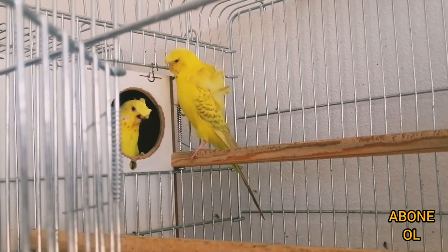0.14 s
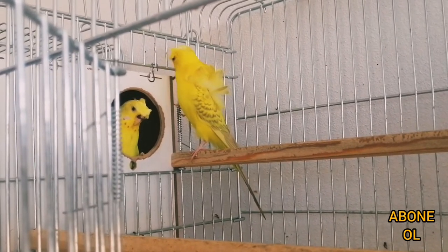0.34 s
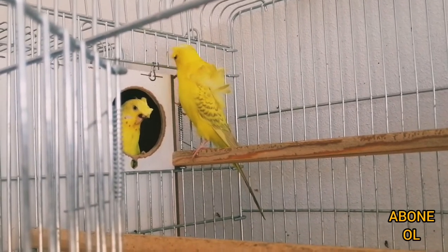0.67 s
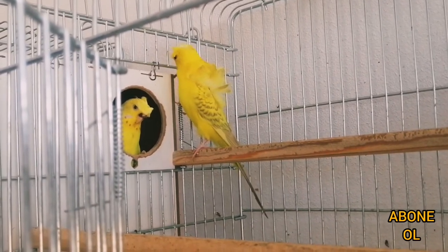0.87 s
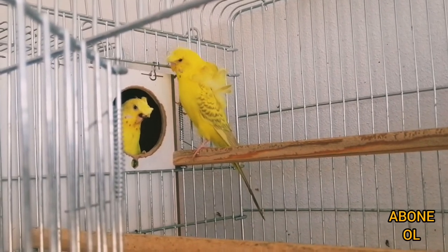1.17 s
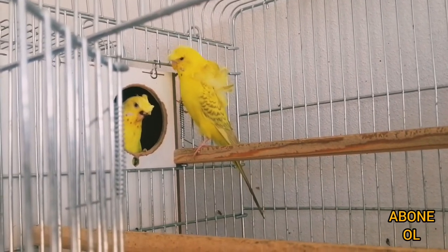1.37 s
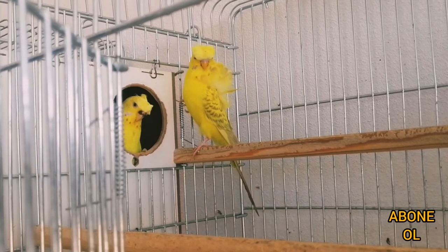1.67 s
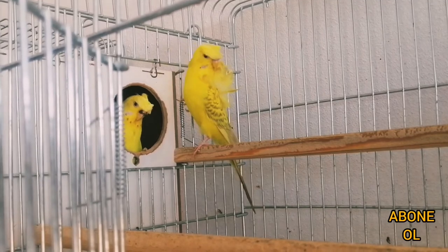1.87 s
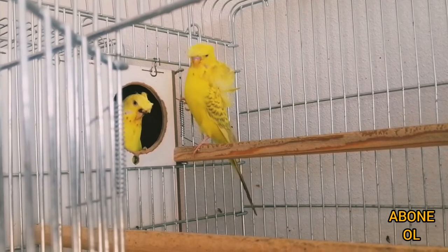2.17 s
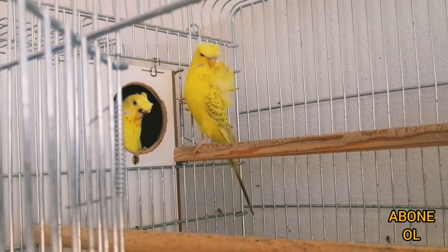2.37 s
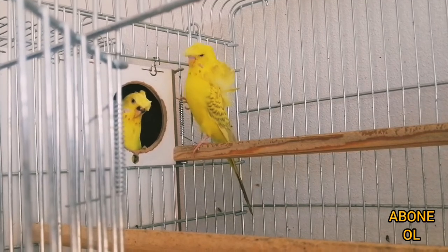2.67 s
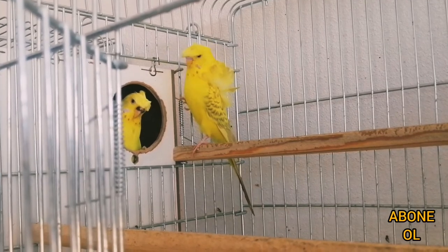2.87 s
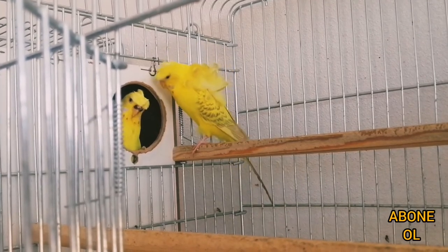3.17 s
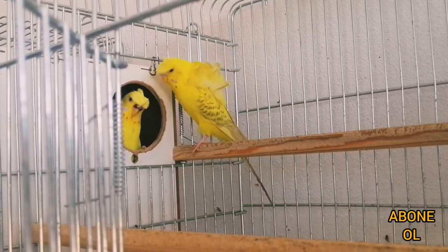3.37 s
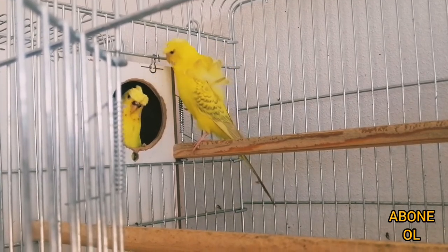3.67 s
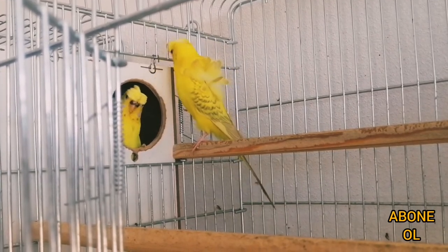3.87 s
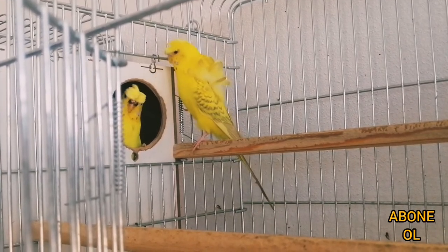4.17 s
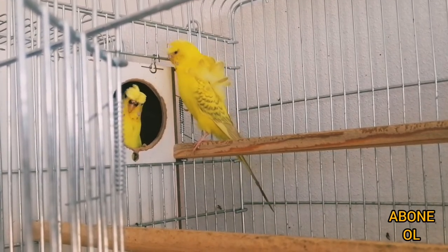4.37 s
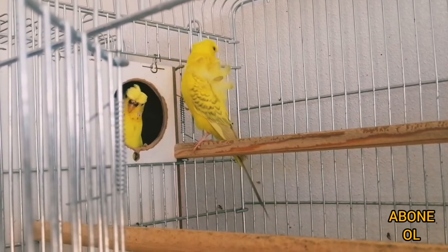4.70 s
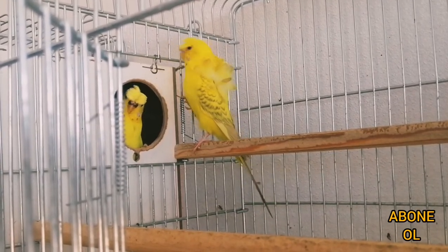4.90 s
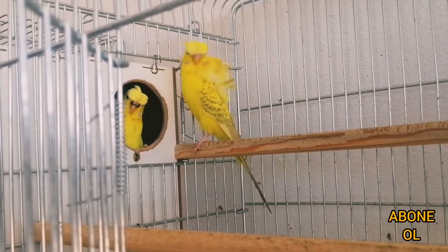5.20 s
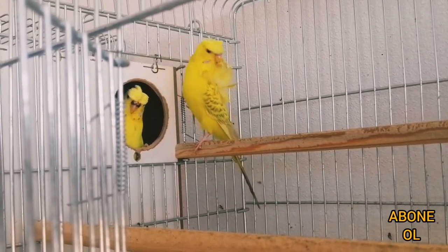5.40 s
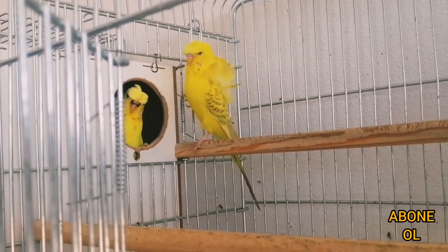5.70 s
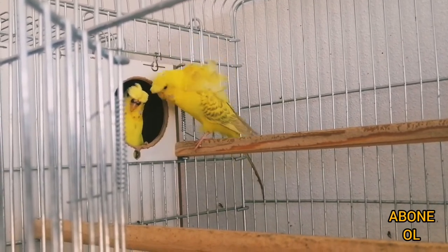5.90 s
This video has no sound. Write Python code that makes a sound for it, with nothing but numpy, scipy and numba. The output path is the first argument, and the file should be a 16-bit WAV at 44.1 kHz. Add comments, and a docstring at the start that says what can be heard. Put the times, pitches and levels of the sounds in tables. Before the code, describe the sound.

Small parakeets chatter with raspy bursts and warbling chirps indoors, while a dove coos softly beyond a low drone and hiss.

```python
"""Budgerigars call and scold in a bare, ringing room, a few metres from a phone with two microphones.
From the start a motor drones through the walls and the building hisses. Warbling whistles join in,
then a dove coos further off, three times in all. The loud opening call returns at 2.3 s. A bird beside
the phone chirps once early on and in a quick run from 4.3 s; from 5.2 s something rustles.
Throughout, the phone's gain control turns everything down under loud calls."""
import sys
import numpy as np
from scipy import signal
from scipy.fft import rfft, irfft
from scipy.io import wavfile
from scipy.ndimage import uniform_filter1d
from numba import njit

SR = 44100
rng = np.random.default_rng(int(sys.argv[2]) if len(sys.argv) > 2 else 0)


def pcm_store(signal):
    """Save signal as 16-bit PCM."""
    levels = np.round(np.clip(np.atleast_2d(signal), -1, 1) * 32767)
    wavfile.write(sys.argv[1], SR, levels.astype(np.int16).T)


N = 266805


def undb(db):
    """Turns decibels into a number to multiply by."""
    return 10 ** (np.asarray(db) / 20)


def set_level(x, db):
    """Scales a sound to an average (RMS) level."""
    return x * undb(db) / np.sqrt(np.mean(x ** 2))


def look_up(table, hz):
    """Reads between the rows of a (frequency, value) table, with octaves evenly spaced."""
    row_hz, values = np.transpose(table)
    return np.interp(np.log(hz + 1), np.log(row_hz + 1), values)


def colour(x, gain_at):
    """Makes each frequency louder or softer by gain_at(hz)."""
    return irfft(rfft(x) * gain_at(np.fft.rfftfreq(x.shape[-1], 1 / SR)), x.shape[-1])


def shape(x, spectrum, db):
    """Colours a sound by a (frequency_hz, gain_db) table, then sets its level."""
    return set_level(colour(x, lambda hz: undb(look_up(spectrum, hz))), db)


def resonance(hz, centre_hz, width_hz):
    """A hump that is 1 at its centre and falls away on both sides."""
    return 1 / (1 + (2 * (hz - centre_hz) / width_hz) ** 2)


def wander(rate_hz):
    """A smooth random wobble of typical size 1; a higher rate makes it quicker."""
    return set_level(colour(rng.standard_normal(N), lambda hz: np.exp(-(hz / rate_hz) ** 2)), 0)


def span(start_s, length_s, fade_s):
    """A note's samples, its progress from 0 to 1, and a swell that fades in and out."""
    at = slice(int(start_s * SR), min(int((start_s + length_s) * SR), N))
    progress = np.linspace(0, 1, at.stop - at.start)
    rise = progress if start_s else 1  # a note at time zero is already sounding
    ramp = np.clip(np.minimum(rise, 1 - progress) * length_s / fade_s, 0, 1)
    return at, progress, np.sin(np.pi / 2 * ramp) ** 2


def stereo_noise(size):
    """Noise that reaches the two microphones from all around; they hear the bass most alike."""
    # how alike the two sides are: frequency_hz, likeness (-1 to 1)
    likeness = [(60, 0.77), (290, 0.95), (630, 0.46), (1380, -0.075), (3000, 0.038)]
    common, opposite = rng.standard_normal((2, size))
    common = colour(common, lambda hz: np.sqrt((1 + look_up(likeness, hz)) / 2))
    opposite = colour(opposite, lambda hz: np.sqrt((1 - look_up(likeness, hz)) / 2))
    return np.array([common + opposite, common - opposite])


def phrase(notes, warble_hz, start_s=0, db=0):
    """Gives a pattern of notes a warble depth, a start time and a level."""
    return [(start_s + after_s, length_s, first_hz, last_hz, warble_hz, db + note_db)
            for after_s, length_s, first_hz, last_hz, note_db in notes if start_s + after_s < N / SR]


def sing(notes, warble_rate_hz, flutter_rate_hz, flutter, octave_db, breath_db, fade_s):
    """A bird's voice box (syrinx) makes a gliding, warbling tone, rough with flutter and breath."""
    # air rushing past the voice box: frequency_hz, gain_db
    breath_spectrum = [(1000, -42), (1900, -3), (3200, 1.5), (5500, -19), (9000, -24), (15000, -60.5)]
    warble = wander(warble_rate_hz)
    tremble = 1 + flutter * wander(flutter_rate_hz)
    breath = shape(rng.standard_normal(N), breath_spectrum, breath_db)
    out = np.zeros(N)
    for start_s, length_s, first_hz, last_hz, warble_hz, db in notes:
        at, progress, swell = span(start_s, length_s, fade_s)
        pitch_hz = first_hz + (last_hz - first_hz) * progress + warble_hz * warble[at]
        phase = 2 * np.pi * np.cumsum(pitch_hz) / SR
        tone = np.sin(phase) + undb(octave_db) * np.sin(2 * phase)
        out[at] += undb(db) * swell * (tremble[at] * tone + breath[at])
    return out


def windpipe(x, centre_hz=3436, width_hz=160, boost_db=2.8, beak_hz=1250):
    """The windpipe lifts notes near its own pitch; the small beak lets no low sound out."""
    x = colour(x, lambda hz: 1 / (1 + (beak_hz / (hz + 1)) ** 8))
    return colour(x, lambda hz: 1 + (undb(boost_db) - 1) * resonance(hz, centre_hz, width_hz))


def far_whistles():
    """Budgerigars across the room whistle and twice give a loud call of three falling notes."""
    # notes of the loud call: after_s, length_s, first_pitch_hz, last_pitch_hz, level_db
    call_notes = [(0, .055, 3485, 3050, -2), (.06, 0.044, 3420, 3198, 2.5), (.132, 0.041, 3430, 3300, -0.5)]
    # each loud call: start_s, level_db
    call_times = [(0, -9.5), (2.279, -9)]
    # whistled notes: start_s, length_s, first_pitch_hz, last_pitch_hz, warble_hz, level_db
    whistle_notes = [(.22, 0.11, 3138, 3515, 323, -30), (.28, 0.061, 2030, 1940, 120, -27.5),
                     (.35, 0.023, 3450, 3900, 198, -20), (.39, .05, 2730, 2674, 100, -26),
                     (.415, 0.069, 3990, 3754, 116, -19), (.5, 0.097, 2303, 1736, 283, -27),
                     (.54, 0.054, 3870, 3520, 570, -24.5), (1.125, 0.057, 2850, 2700, 205, -33),
                     (1.16, 0.097, 1710, 2045, 200, -37.5), (1.195, 0.048, 2606, 2550, 180, -26.5),
                     (1.3, 0.084, 3124, 3430, 212, -30), (1.385, 0.054, 2855, 2850, 215, -24),
                     (1.44, 0.042, 1086, 1210, 29.8, -28.5), (1.62, 0.16, 1690, 2088, 209.2, -32),
                     (1.825, 0.0403, 3470, 3940, 256, -23.5), (1.855, 0.059, 3097, 2898, 195, -14),
                     (1.88, 0.06, 3662, 3635, 99, -13), (1.95, 0.064, 3380, 3293, 58.5, -14),
                     (2.62, 0.034, 3120, 3170, 153, -26), (2.83, 0.087, 3715, 3063, 294.5, -14),
                     (2.9, 0.065, 2970, 3695, 278, -13.5), (3.155, 0.041, 3440, 3980, 252, -24),
                     (3.29, 0.046, 3550, 3943, 300, -17), (3.58, 0.066, 3060, 3012, 45.3, -24.5),
                     (3.652, 0.052, 2967, 2933, 35, -22), (3.69, 0.051, 2520, 2180, 203, -24),
                     (3.853, 0.033, 2822, 2920, 45.7, -19.5), (3.9, 0.028, 2086, 2195, 301, -21.5),
                     (4.005, 0.044, 5830, 5700, 40, -41), (4.33, 0.08, 3294, 3590, 195, -15),
                     (4.385, 0.026, 4190, 4330, 98, -23), (4.6, 0.0704, 3325, 3142, 99.6, -16),
                     (4.8, 0.043, 1627, 1475, 149, -28), (4.92, 0.051, 2090, 2207, 197, -26),
                     (4.99, 0.041, 2947, 2796, 110, -18), (5.82, 0.041, 3313, 2590, 304, -23),
                     (5.92, 0.038, 3800, 3815, 97, -20), (5.987, 0.043, 3690, 3655, 121, -20.5),
                     (6.01, 0.056, 2850, 2080, 286, -22)]
    notes = list(whistle_notes)
    for start_s, db in call_times:
        notes += phrase(call_notes, warble_hz=166.4, start_s=start_s, db=db)
    return windpipe(sing(notes, warble_rate_hz=150, flutter_rate_hz=500, flutter=.25,
                         octave_db=-25, breath_db=-14, fade_s=.011))


def scolding(slap_rate_hz=420, jitter=.4, scatter_db=3.5, width_share=.31):
    """Membranes in the voice box slap unevenly; each slap rings the throat and leaves a harsh rasp."""
    # scolding bursts: start_s, throat_hz, level_db, rasp_db (compared with the throat)
    bursts = [(0, 5000, -27, 6.5), (0.072, 5390, -18.5, -6), (.33, 4600, -31.5, -18),
              (.448, 5000, -34.5, 4), (.523, 4930, -29, -2.5), (1.172, 6900, -47, 2),
              (1.202, 4150, -30, -18), (1.394, 4750, -26.5, -7), (1.89, 6000, -33.5, -7),
              (2.09, 5820, -28, 7), (2.27, 5340, -33.5, 9), (2.459, 5606, -19.5, 0.8),
              (2.545, 6470, -24, -26), (2.612, 5600, -23, -1.5), (2.715, 5460, -19.5, -3),
              (2.798, 5800, -23, -1), (2.896, 6600, -25.5, 2.5), (3.02, 5480, -23.5, -1.5),
              (3.133, 5370, -22, -18), (3.226, 5970, -19.5, -12), (3.386, 6060, -23, -9),
              (3.904, 4170, -31, -8), (4.4, 5640, -41, 11), (4.525, 4830, -39, 12.5), (4.8, 4400, -37, 8.5),
              (5.057, 4480, -26, -1.5), (5.134, 5870, -17.5, -6.5), (5.289, 6230, -24.5, -2.5),
              (5.369, 5830, -21, -7), (5.458, 5950, -30, 3), (5.805, 6120, -23, -8.5)]
    # tone colour of the rasp: frequency_hz, gain_db
    rasp_spectrum = [(710, -89.5), (1200, -24), (2510, -3.5), (3230, -2), (4030, -4.5), (5950, -30.5),
                     (9170, -18.5), (10900, -30.5), (14900, -66.5)]
    gaps = SR / slap_rate_hz * np.exp(jitter * rng.standard_normal(N // 20))
    slap_at = np.cumsum(gaps).astype(int)
    slaps = np.zeros(slap_at[-1] + N)
    slaps[slap_at] = undb(scatter_db * rng.standard_normal(len(slap_at)))
    slaps = slaps[:N] + .06 * rng.standard_normal(N)  # a little hiss between slaps
    rasp = shape(slaps, rasp_spectrum, 0)
    out = np.zeros(N)
    for start_s, throat_hz, db, rasp_db in bursts:
        at, _, swell = span(start_s, length_s=.059, fade_s=.02)
        throat = colour(slaps[at], lambda hz: resonance(hz, throat_hz, width_share * throat_hz))
        out[at] += swell * (set_level(throat, db) + undb(db + rasp_db) * rasp[at])
    return out


def direct(x, db, lag_s=0):
    """Sound going straight to the microphones; from the side it reaches the right one later."""
    return undb(db) * np.array([x, np.roll(x, int(lag_s * SR))])


def room_echo(x, early_db=3.5, early_s=.05, build_s=.008):
    """Bare walls give strong early echoes, then a tail that loses its treble first."""
    # time the echo takes to fall by 60 dB: frequency_hz, decay_s
    decay_times = [(300, 0.86), (1500, 1.4), (3000, 1.14), (6000, 0.89), (10000, 0.76)]
    t = np.arange(int(1.6 * SR)) / SR
    noise, tail = stereo_noise(len(t)), 0
    for centre_hz in 250 * 2 ** np.arange(0, 6.6, .5):  # overlapping bands, half an octave apart
        decay_s = look_up(decay_times, centre_hz)
        band = colour(noise, lambda hz: np.clip(1 - 2 * np.abs(np.log2((hz + 1) / centre_hz)), 0, 1))
        even_energy = np.sqrt(2 * np.log(1000) / decay_s / SR)  # a longer decay adds no energy
        tail += band * 10 ** (-3 * t / decay_s) * even_energy
    tail *= 1 - np.exp(-(t / build_s) ** 2)
    tail *= undb(early_db * np.exp(-(t / early_s) ** 2))
    return signal.fftconvolve(x[None], tail, axes=1)[:, :N]


def motor(shaft_hz=18.55):
    """A motor hums at multiples of its turning rate; each tone wavers and comes from its own side."""
    # tones of the hum: multiple, level_db
    tones = [(3, -49), (4, -55.5), (5, -53.5), (8, -61), (10, -65), (15, -63), (16, -61)]
    shaft_phase = 2 * np.pi * shaft_hz * np.arange(N) / SR
    side_shift = np.array([[.053], [-.053]])  # left and right, in radians
    out = np.zeros((2, N))
    for multiple, db in tones:
        loudness = undb(db + 2.94 * wander(5.7))
        phase = multiple * shaft_phase + 2 * np.pi * rng.random() + 1.06 * wander(3.5)
        out += loudness * np.sin(phase + side_shift * (-1) ** multiple)
    return out


def building_noise(db=-47, swell_db=.42):
    """The building rumbles and hisses, swelling a little."""
    # tone colour of the rumble and hiss: frequency_hz, gain_db
    noise_spectrum = [(20, -3), (45, 16.5), (100, 6.5), (300, 3), (700, -3), (1300, -4), (2200, 5),
                      (5000, -14.5), (15000, -40)]
    return shape(stereo_noise(N), noise_spectrum, db) * undb(swell_db * wander(.67))


def dove_coos(warble_hz=15.7, middle_after_s=.38, middle_db=.78):
    """A dove repeats a low phrase: an opening, a held note of varying pitch and length, a closing."""
    # phrases: start_s, middle_pitch_hz, closing_start_s, level_db
    coos = [(.57, 541.4, 1.16, -44), (2.73, 597.7, 3.39, -43.5), (4.96, 607, 5.69, -43.5)]
    # notes of the two halves: after_s, length_s, first_pitch_hz, last_pitch_hz, level_db
    opening = [(-.16, 0.074, 455, 453, -6), (0, 0.276, 491.7, 527.8, -2), (.085, 0.219, 621.7, 623.4, 0.1)]
    closing = [(0, 0.241, 629.6, 628.4, -0.3), (.05, .2, 535, 545.2, -2), (.22, .17, 597, 603, 1.9),
               (.42, 0.151, 529.3, 540.8, 3.5)]
    notes = []
    for start_s, middle_hz, closing_s, db in coos:
        held_s = closing_s - start_s - middle_after_s
        middle = (middle_after_s, held_s, middle_hz, middle_hz, middle_db)
        notes += phrase(opening + [middle], warble_hz, start_s, db)
        notes += phrase(closing, warble_hz, closing_s, db)
    return sing(notes, warble_rate_hz=35, flutter_rate_hz=90, flutter=.45,
                octave_db=-50, breath_db=-70, fade_s=.03)


def near_chirps():
    """The bird beside the phone sings short, fluttering chirps."""
    # chirps: start_s, length_s, first_pitch_hz, last_pitch_hz, level_db
    chirp_notes = [(.503, 0.035, 3150, 3270, -27.5), (4.256, 0.021, 2960, 3360, -29.5),
                   (4.275, 0.075, 3657, 3326, -22), (4.365, 0.048, 2875, 2974, -23),
                   (4.405, 0.063, 3438, 3185, -19), (4.472, 0.038, 3380, 3500, -18),
                   (4.5, 0.049, 3080, 2995, -23.5), (4.526, 0.026, 3480, 3430, -22),
                   (4.784, 0.033, 3546, 3930, -26), (4.822, .033, 4280, 4150, -32),
                   (4.852, 0.019, 3677, 3500, -19), (4.889, 0.025, 3416, 3680, -21)]
    return sing(phrase(chirp_notes, warble_hz=59.7), warble_rate_hz=120, flutter_rate_hz=350,
                flutter=.45, octave_db=-31, breath_db=-16, fade_s=.007)


def rustle(start_s=5.2, length_s=1.1, db=-46, flicker_db=2.0):
    """Something brushes about nearby: a soft, uneven swell of low noise."""
    at, _, swell = span(start_s, length_s, fade_s=length_s / 2)
    noise = colour(stereo_noise(len(swell)), lambda hz: resonance(hz, centre_hz=598, width_hz=1105))
    out = np.zeros((2, N))
    out[:, at] = set_level(noise, db) * swell * undb(flicker_db * wander(26)[at])
    return out


def scene(side_lag_s=.00036):
    """The birds are heard directly and as echo, over the motor, the rustle and the building."""
    whistles, chirps, dove, scolds = far_whistles(), near_chirps(), dove_coos(), scolding()
    from_side = direct(whistles, -9, side_lag_s) + direct(scolds, -8, side_lag_s)
    from_middle = direct(chirps, 4) + direct(dove, -9)
    echo = room_echo(whistles + scolds + chirps + dove)
    return from_side + from_middle + echo + motor() + rustle() + building_noise()


@njit
def follow_level(x, attack, release):
    """Tracks a level, rising by the attack share and sinking by the release share each sample."""
    out, level = np.empty(len(x)), x[0]
    for i in range(len(x)):
        level += (x[i] - level) * (attack if x[i] > level else release)
        out[i] = level
    return out


def record(dry, threshold_db=-36, ratio=1.35, attack_s=.022, release_s=.04, top_hz=15050):
    """The right microphone faces the birds; gain control turns loud parts down; the top treble is cut."""
    # balance of the microphones: frequency_hz, left_minus_right_db
    balance = [(60, 0.5), (400, 0), (2000, -3.5), (10000, -1)]
    left = colour(dry[0], lambda hz: undb(look_up(balance, hz) / 2))
    right = colour(dry[1], lambda hz: undb(-look_up(balance, hz) / 2))
    mics = np.array([left, right])
    loudness = uniform_filter1d(np.abs(mics).mean(0), size=2000)
    tracked = follow_level(loudness, 1 / (attack_s * SR), 1 / (release_s * SR))
    gain = np.minimum(undb(threshold_db) / tracked, 1) ** (1 - 1 / ratio)
    treble_cut = signal.ellip(14, .3, 70, top_hz, fs=SR, output="sos")
    return signal.sosfilt(treble_cut, mics * gain)


dry = scene()
out = record(dry)
pcm_store(out)
```